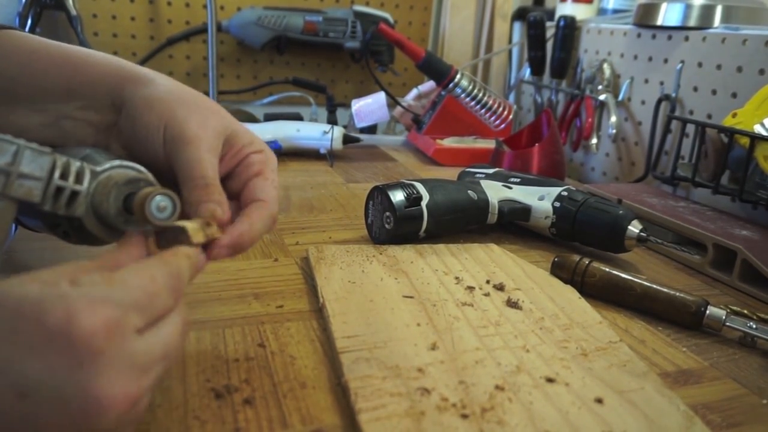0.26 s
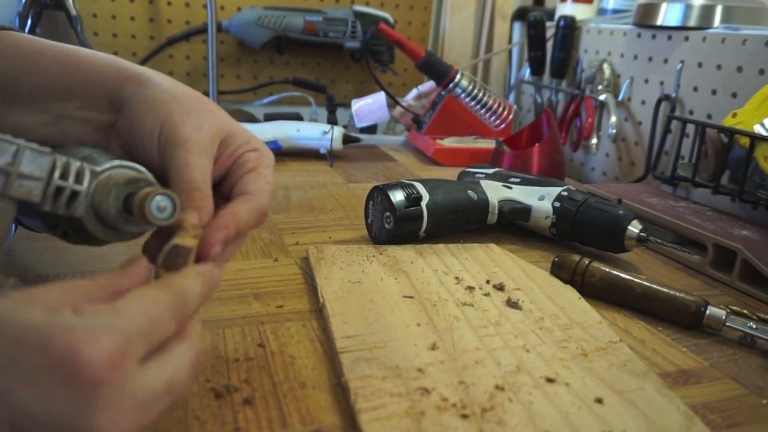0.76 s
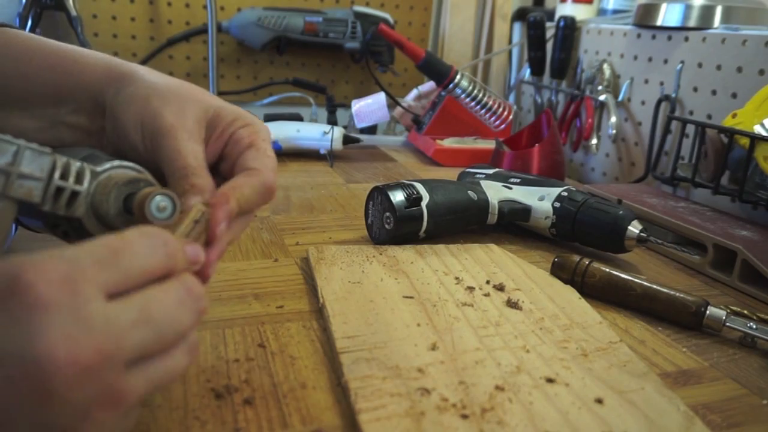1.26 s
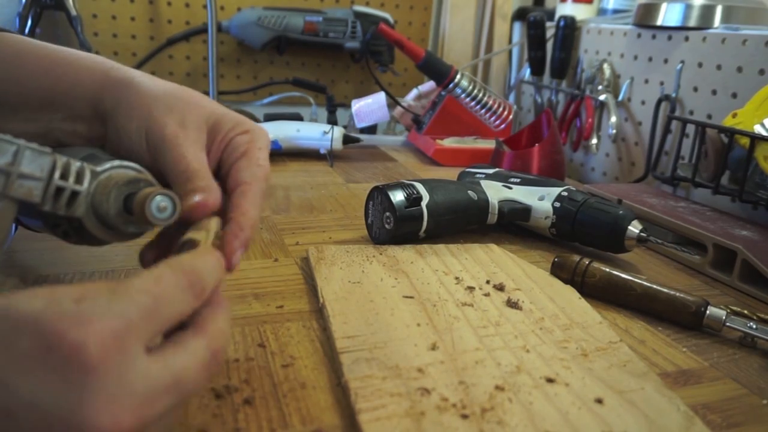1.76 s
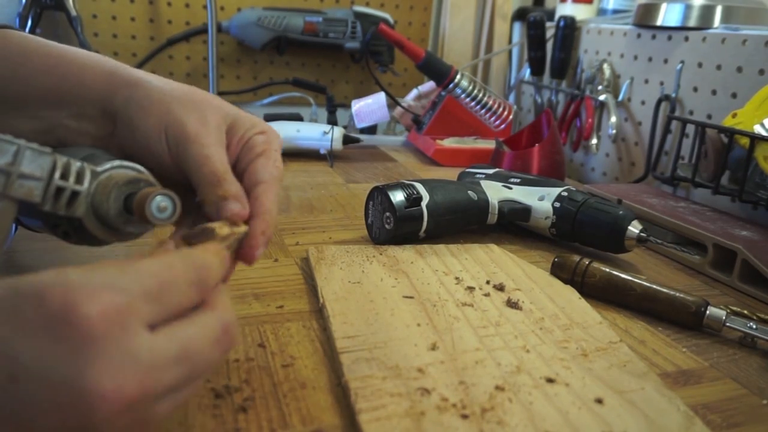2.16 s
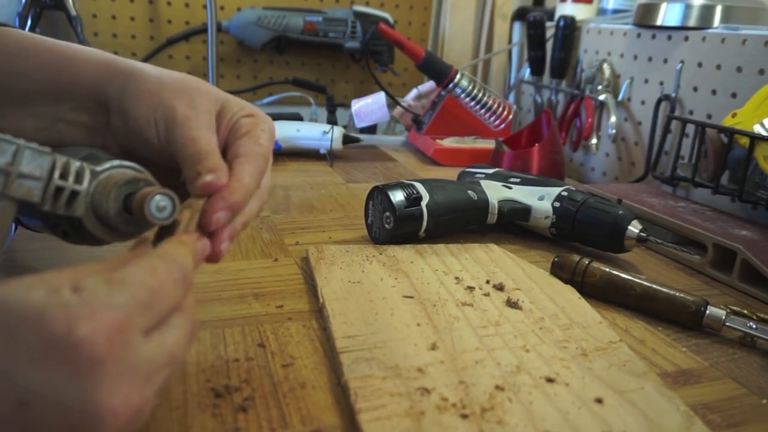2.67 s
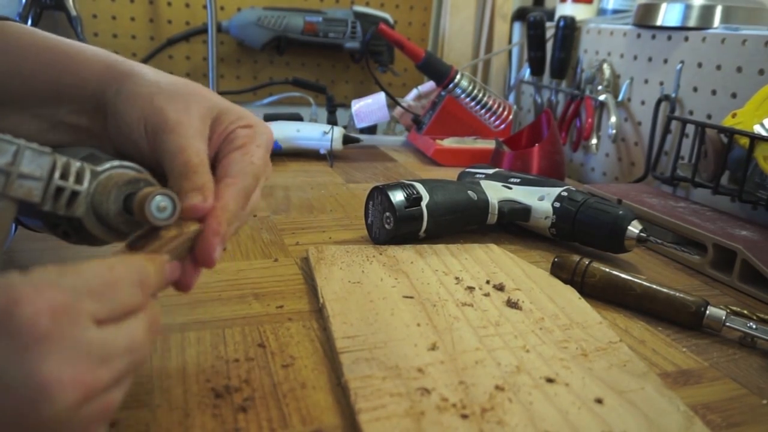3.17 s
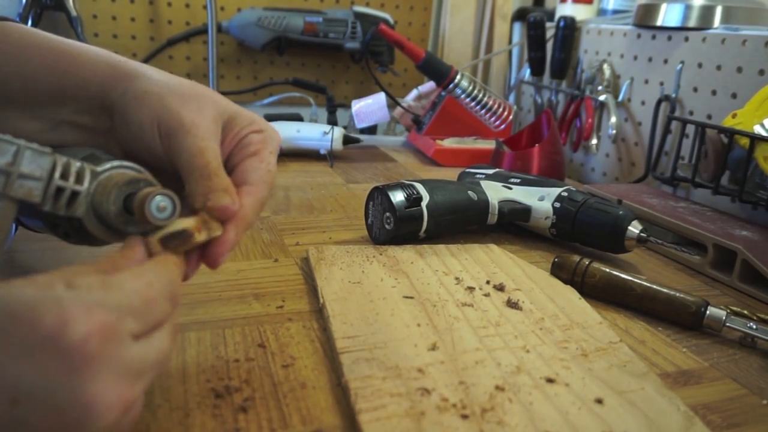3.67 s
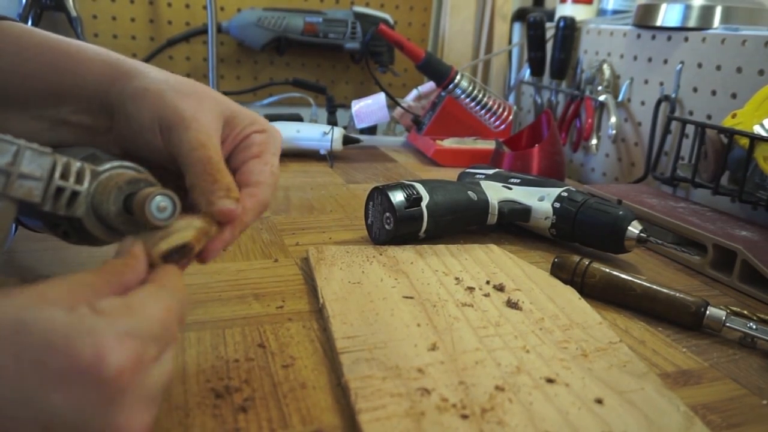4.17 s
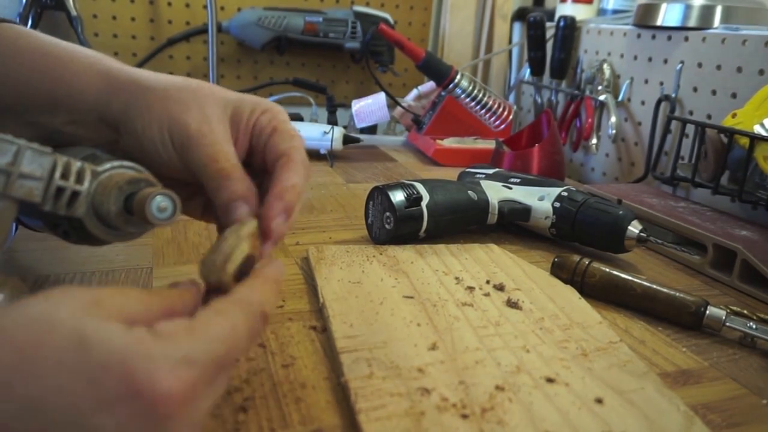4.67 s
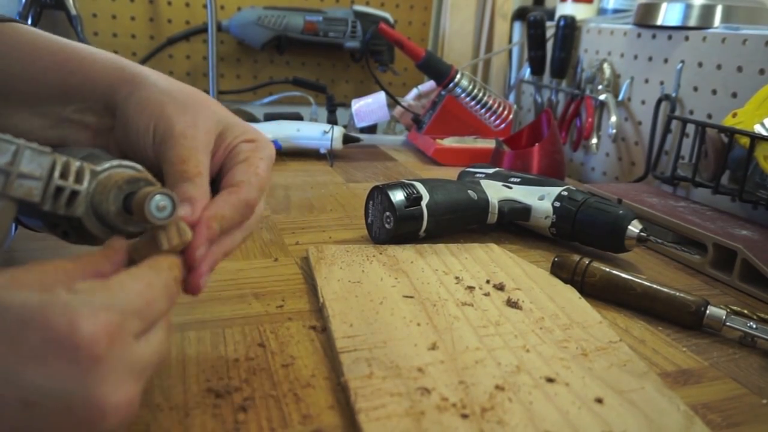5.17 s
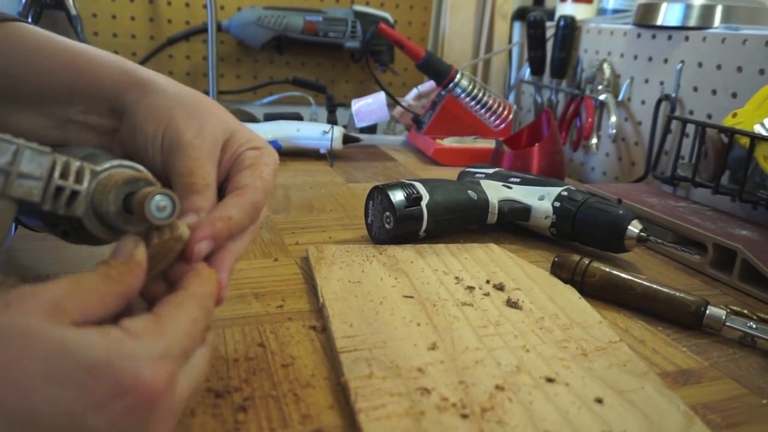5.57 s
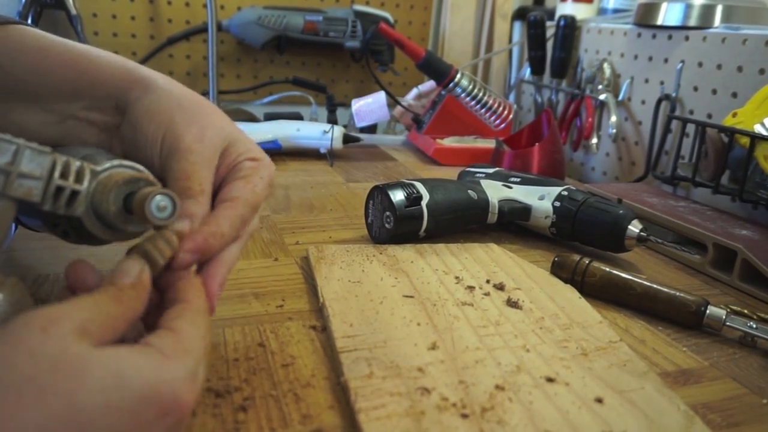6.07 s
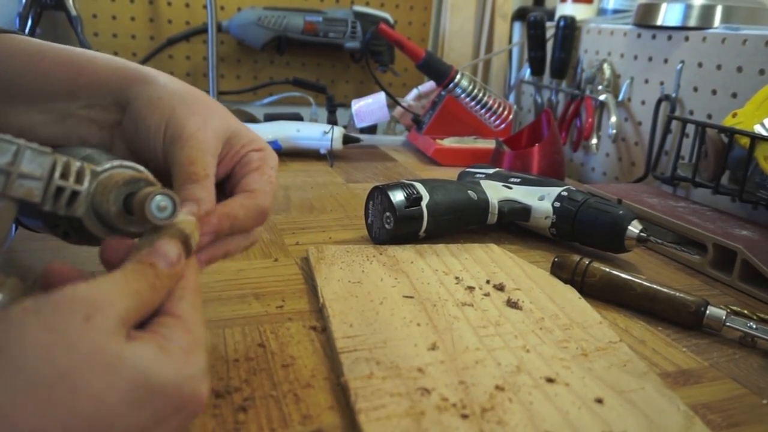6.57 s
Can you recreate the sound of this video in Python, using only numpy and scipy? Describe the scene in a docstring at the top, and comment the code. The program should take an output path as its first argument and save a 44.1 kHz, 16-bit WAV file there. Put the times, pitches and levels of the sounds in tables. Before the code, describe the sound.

A little high-speed motor whines and hisses near the microphone at a workbench. Wood touches the spinning bit again and again, making brief nasal, gritty grinding bursts with dipping pitch. The touches become almost continuous around three to four seconds, then the tool spins freely with one tiny rattle, and separate strokes resume, some very short. A faint low wavering hum lies behind the later part.

```python
"""A small rotary tool runs close to the microphone; wood already presses its bit as the sound opens.
Each short stroke drags the motor's pitch down and makes the bit sing and rasp; between strokes it spins up again.
The chopped motor current whines at a steady pitch, mostly louder under load, and cooling air hisses throughout.
Now and then the bit rattles briefly. A faint wavering hum grows in the background after the first two seconds.
The strokes pause from about 4.2 to 5.1 s, then go on to the end."""
import sys
import numpy as np
from scipy import signal
from scipy.fft import rfft, irfft, next_fast_len
from scipy.io import wavfile

SR = 44100
rng = np.random.default_rng(int(sys.argv[2]) if len(sys.argv) > 2 else 0)


def transcribe(u):
    """Save the signal u as a 16-bit wav file named by the first command-line argument.

    u: samples, shape (n,) or (channels, n), limited to [-1, 1]; the rate is SR.
    q: integer samples, one column per channel.
    """
    v = np.clip(np.atleast_2d(u).T, -1, 1)
    q = np.round(v * 32767).astype(np.int16)
    wavfile.write(sys.argv[1], SR, q)


N = 300321

FREE_HZ, CHOP_HZ = 1358, 960.25  # pitch of the free-running motor, rate of the current chopping


def amp(db):
    """Decibels to gain."""
    return np.exp(np.asarray(db) * (np.log(10) / 20))


def unit(x):
    """Scale to rms 1."""
    return x / np.sqrt(np.mean(x ** 2) + 1e-20)


def along(points, hz):
    """Read (hz, value) points on a log frequency axis."""
    f, v = np.transpose(points)
    return np.interp(np.log(hz + 1), np.log(f), v)


def curve(rows):
    """One value per sample from (s, value) rows."""
    return np.interp(np.arange(N) / SR, *np.transpose(rows))


def wobble(rate):
    """A smooth random curve, rate knots a second."""
    knots = rng.standard_normal(int(N * rate / SR) + 4)
    fine = signal.resample_poly(knots, 8, 1)
    fine_at = np.linspace(0, len(knots), len(fine), endpoint=False)
    return np.interp(np.arange(N) * (rate / SR), fine_at, fine)


def filtered(x, response):
    """x times a response of frequency."""
    size = next_fast_len(N + SR // 4)
    return irfft(rfft(x, size) * response(np.fft.rfftfreq(size, 1 / SR)), size)[..., :N]


def panned(db):
    """Left and right gains for a level difference."""
    return amp(np.array([[.5], [-.5]]) * db)


def noise(spectrum):
    """Stereo noise of rms 1: the share of mid and side sets how alike left and right are."""
    # left-right likeness: hz, correlation
    likeness = [(60, .1), (200, 0.27), (450, 0.91), (1400, 0.94), (2400, 1), (4000, 0.78), (4900, 1),
                (8000, 0.11), (15000, 0.43)]

    def colour(hz):
        angle = np.arccos(np.clip(along(likeness, hz), -1, 1)) / 2
        return amp(along(spectrum, hz)) * [np.cos(angle), np.sin(angle)]

    mid, side = filtered(rng.standard_normal((2, N)), colour)
    return unit(np.array([mid + side, mid - side]))


def strokes():
    """Drag on the motor (Hz) and grinding gain: each stroke catches, presses, eases off and lifts."""
    # strokes of wood against the bit; overlapping ones are one cut with shifting pressure:
    # touch_s, time_to_full_pressure_s, length_s, drag_hz (before the motor's lag),
    # grinding_level_db (relative), first_touch_accent_db
    presses = [(-0.081, 0.048, 0.182, 388, -0.7, 0), (0.094, 0.051, 0.11, 745, 0.0, 2),
               (0.295, 0.085, 0.18, 649, -0.5, 2.5), (0.597, 0.074, 0.15, 593, 0.7, 3.3),
               (0.963, 0.084, 0.15, 500.3, -0.17, 2), (1.219, 0.071, 0.16, 577, -0.2, 2.2),
               (1.46, 0.03, 0.083, 689, -0.3, 4.5), (1.843, 0.063, 0.092, 199.4, -0.2, -0.5),
               (2.025, 0.064, 0.15, 227, 1.8, -0.5), (2.297, 0.079, 0.11, 372, 1, 3),
               (2.541, 0.08, 0.24, 569, 0, 1.5), (2.816, 0.074, 0.13, 571, 2, -2),
               (2.952, 0.066, 0.13, 275.6, -0.0, -6.5), (3.061, 0.046, 0.14, 378, 0.6, 0.5),
               (3.204, 0.013, 0.096, 147, 1.3, -8.5), (3.264, 0.028, 0.092, 497, -0.7, 0.5),
               (3.337, 0.047, 0.122, 237.3, 1.63, -3), (3.406, 0.06, 0.165, 400, 1.2, 1),
               (3.537, 0.078, 0.16, 297, 0.66, -0.5), (3.655, 0.028, 0.104, 481.5, 0.67, 0.2),
               (3.756, 0.023, 0.116, 256.8, -0.2, 5), (3.813, 0.027, 0.095, 384.3, -0.8, 5.5),
               (3.904, 0.029, 0.062, 349.7, 1.5, -1), (3.955, 0.033, 0.082, 418, 1, 1),
               (4.023, 0.053, 0.176, 420, 0.5, -0.5), (4.159, 0.047, 0.08, 519.6, 1.7, -1.5),
               (5.073, 0.073, 0.15, 633, -1.5, 1.5), (5.289, 0.007, 0.018, 30, 4, -0.5),
               (5.329, 0.073, 0.11, 626, 0.5, -1.0), (5.501, 0.086, 0.15, 735, -1.0, -7),
               (5.709, 0.035, 0.1, 641, -0.5, 2.5), (5.856, 0.064, 0.13, 627, -0.4, -2),
               (5.999, 0.032, 0.085, 668, -2, 6), (6.117, 0.03, 0.069, 543, -4, 11.5),
               (6.285, 0.057, 0.11, 576.6, 0.2, 3), (6.465, 0.037, 0.067, 491, -3, 2.5),
               (6.579, 0.041, 0.073, 581.3, -1, 3.8), (6.744, 0.045, 0.096, 560, -3, 6)]
    # the hand presses almost evenly harder, then eases off ever faster (powers of the elapsed share)
    press_power, ease_power = 1.096, 3.08
    # the bit catches the wood at once and lets go a little more slowly
    catch_s, let_go_s = 0.0081, 0.02099
    accent_s = 0.025  # how long the first touch stands out
    t = np.arange(N) / SR
    drag, contact = np.zeros(N), np.zeros(N)
    for touch, rise, length, drag_hz, db, accent_db in presses:
        on = (t > touch) & (t < touch + length)
        age = t[on] - touch
        press = np.clip(age / rise, 0, 1) ** press_power
        ease = np.clip((age - rise) / (length - rise), 0, 1) ** ease_power
        drag[on] += drag_hz * press * (1 - ease)
        grip = np.clip(np.minimum(age / catch_s, (length - age) / let_go_s), 0, 1)
        level = amp(db + accent_db * np.exp(-(age / accent_s) ** 2))
        contact[on] = np.maximum(contact[on], level * grip)
    return drag, contact


def lagged(x, lag_s):
    """x followed with inertia."""
    keep = np.exp(-1 / (lag_s * SR))
    return x[0] + signal.lfilter([1 - keep], [1, -keep], x - x[0])


def speed(drag):
    """The motor's pitch sags under drag and recovers quickly at first, then slowly."""
    quick_lag_s, slow_lag_s, slow_share = .0112, .044, .546
    quick_sag = (1 - slow_share) * lagged(drag, quick_lag_s)
    slow_sag = slow_share * lagged(drag, slow_lag_s)
    return FREE_HZ - quick_sag - slow_sag


def cutting(pitch, turn, load, drift_db, shimmer_db, jitter, load_jitter, blur, spread):
    """The bit strikes once a cycle; its harmonics sweep through fixed resonances and roughen under load."""
    # what tool and wood radiate for each harmonic, body then treble: hz, level_db (relative)
    radiation = [(600, -10), (820, -6), (980, 2.5), (1060, -3), (1170, -22.5), (1400, -23.5), (1650, -12),
                 (2000, -10), (2280, -27.5), (2800, -9.5), (3120, -26), (3550, -11), (4350, -21)] + [(4900, -15), (5350, -10.5), (6000, -6.5), (6500, -4), (7200, -15),
                                (8200, -14.5), (9000, -19), (10100, -10.5), (11000, -17), (13000, -7.5),
                                (14200, -16), (15300, -9.5), (16500, -23)]
    slip = (jitter + load_jitter * load ** 4) * (wobble(170) + .4 * wobble(600))
    out = np.zeros((2, N))
    for k in range(1, 20):
        hz = k * pitch
        high = np.minimum(hz / 6000, 1)
        # the changing contact patch reshuffles the upper harmonics
        reshuffle_db = drift_db * np.tanh(2 * wobble(32)) + shimmer_db * wobble(150)
        level_db = along(radiation, hz) + high * reshuffle_db
        phase = k * (turn + slip) + high * blur * wobble(200) + rng.uniform(0, 2 * np.pi)
        # short waves reach left and right by different paths around the hands
        apart = spread * hz / 10000 * wobble(14)
        wave = np.sqrt(2) * np.sin([phase + apart, phase - apart])
        out += amp(level_db) * (hz < SR / 2) * wave
    return out


def rasp(turn, load, db, load_db, pulsing, grain_db):
    """Fibres tear in uneven puffs, one each cycle, louder under heavy load."""
    # colour of torn fibres: hz, density_db_per_hz (relative)
    fibre_colour = [(30, -11.5), (250, -11.5), (600, -13), (950, -17), (1350, -25), (1750, -9), (2250, -32),
                    (2750, 15), (3150, -9), (3600, 8.5), (4400, -25), (6200, 15), (7500, -5), (10500, -0.5),
                    (13000, 11.5), (16000, -8)]
    puffs = (1 + pulsing * np.cos(turn)) * amp(grain_db * wobble(450))
    return amp(db + load_db * load ** 2) * unit(puffs * noise(fibre_colour))


def bench(x):
    """Short reflections from the bench and the wall behind it, different for left and right."""
    # small things on the bench scatter mainly the treble: hz, gain_db (added to level_db)
    scatter = [(1000, -7), (4000, 2.5)]
    level_db, t60_s = -11.5, 0.11
    t = np.arange(SR // 5) / SR
    tail = rng.standard_normal((2, len(t))) * np.exp(-np.log(1000) * t / t60_s)
    tail /= np.linalg.norm(tail, axis=1, keepdims=True)
    echoes = signal.fftconvolve(x, tail, axes=1)[:, :N]
    return filtered(echoes, lambda hz: amp(level_db + along(scatter, hz)))


def motor_tones(tones, pitch, turn, chop, blur, flutter_db):
    """Motor harmonics and their sidebands with the chopping; they flare when they cross a resonance."""
    # resonances of spindle and housing: centre_hz, width_hz, peak_db
    resonances = [(6308, 296, 22), (10810, 140, 6.5), (15600, 250, 21)]
    out = np.zeros(N)
    for k, m, db in tones:
        k, m = round(k), round(m)
        tone_hz = k * pitch + m * CHOP_HZ
        flare_db = sum(peak_db / (1 + ((tone_hz - hz) / width_hz) ** 2)
                       for hz, width_hz, peak_db in resonances)
        phase = k * turn + m * chop + blur * wobble(110) + rng.uniform(0, 2 * np.pi)
        out += amp(db + flare_db + flutter_db * wobble(70)) * np.sqrt(2) * np.sin(phase)
    return out


def motor(pitch, turn, chop):
    """The turning shaft gives clear tones; the brushes on the commutator give fuzzy ones."""
    # both tables: multiple_of_motor_pitch, plus_multiple_of_chopping_rate, level_db (off resonance)
    shaft_tones = [(1, 0, -49.5), (2, 0, -59), (3, 0, -49.5), (5, 0, -59), (1, 1, -50), (1, 2, -50),
                   (1, 3, -56.5), (2, 1, -79)]
    brush_tones = [(5, 0, -59), (6, 0, -54.5), (7, 0, -53), (8, 0, -51.5), (8, 1, -54.5), (8, -2, -57.5),
                   (12, 0, -76)]
    shaft = motor_tones(shaft_tones, pitch, turn, chop, blur=0.091, flutter_db=1.97)
    return shaft + motor_tones(brush_tones, pitch, turn, chop, blur=0.8, flutter_db=1.5)


def chopper(chop, load, flutter_db):
    """The current's steady whine follows the load; alternate pulses differ, adding a halfway tone."""
    # whine of the chopped current: multiple_of_chopping_rate, free_running_db, gain_at_full_load_db
    whine = [(1, -47, 9), (2, -39, 6.5), (2.5, -62, -17), (3, -41.5, 11.5), (4, -42, 8), (5, -52, 1.5),
             (6, -58.5, 1)]
    out = np.zeros(N)
    for k, db, gain_db in whine:
        phase = round(2 * k) / 2 * chop + rng.uniform(0, 2 * np.pi)
        out += amp(db + gain_db * load + flutter_db * wobble(60)) * np.sqrt(2) * np.sin(phase)
    return out


def rattles(grain_db):
    """The bit chatters for a moment, as short swells of grainy noise."""
    # brief rattles of the bit: centre_s, level_db, half_length_s
    bursts = [(1.628, -31.5, 0.015), (4.075, -36, 0.0073), (4.508, -27, 0.011), (5.57, -28, 0.013),
              (6.258, -28.5, 0.012)]
    # their colour: hz, density_db_per_hz (relative)
    clatter = [(300, -38), (1300, -28), (1750, -4), (2300, -10.5), (3200, 0), (3700, -3), (4400, -13),
               (6000, -15), (16000, -22)]
    t = np.arange(N) / SR
    swell = sum(amp(db) * np.exp(-((t - s) / length) ** 4) for s, db, length in bursts)
    return swell * unit(amp(grain_db * np.tanh(wobble(410))) * noise(clatter))


def air(load, db, load_db, flutter_db):
    """Cooling air and brush hiss leave through the vents as noise."""
    # colour of the air: hz, density_db_per_hz (relative)
    vent_colour = [(30, -28), (300, -27), (700, -17), (1100, -11), (1550, -13), (2250, -10), (2700, 4.5),
                   (3100, -12), (3700, -1.5), (4600, -11.5), (7500, -2), (10000, -10), (12500, -7),
                   (14400, -15.5), (15400, -5), (15900, -10.5)]
    return amp(db + load_db * load + flutter_db * wobble(90)) * noise(vent_colour)


def ports(hz):
    """Level and phase of the close tool at each microphone port."""
    # where the tool sits between the two ports: hz, left_minus_right_db, left_lead_rad
    lean = [(950, -.3, .38), (1350, 1.5, .1), (1900, -.7, .15), (2500, .2, .05), (2880, 2.5, .62),
            (3300, .6, .2), (3850, 1, .9), (4400, -1.5, .3), (4800, .4, .3), (5400, 3.5, .1),
            (6100, -3.5, .6), (6900, -.5, 1.2), (8200, 1, .6), (9100, 5, -.3), (10100, 0, .5),
            (13500, 6, 1), (15500, 6, 1.5)]
    f, db, lead = np.transpose(lean)
    turned = np.exp(np.array([[.5j], [-.5j]]) * along(np.c_[f, lead], hz))
    return panned(along(np.c_[f, db], hz)) * turned


def hum(waver, waver_db):
    """A faint low hum in the background wavers, with thin tones that come and go."""
    # level of the hum: time_s, level_db
    hum_level = [(0, -83), (2.2, -81), (2.8, -69.5), (4.3, -64.5), (5.2, -67), (5.9, -61), (6.8, -69.5)]
    # its colour: hz, density_db_per_hz (relative)
    hum_colour = [(200, -32.5), (350, -10.5), (400, -5), (440, -8), (480, -1.5), (550, -28), (900, -49)]
    # thin tones in the hum: pitch_hz, level_db, loudest_at_s, half_length_s
    thin_tones = [(397, -70.5, 3.5, 1.28), (482, -75.5, 3.5, 2.8), (705, -68.5, 1.3, 1.09)]
    t = np.arange(N) / SR
    out = amp(curve(hum_level) + waver_db * wobble(5.4)) * noise(hum_colour)
    for hz, db, s, length in thin_tones:
        phase = 2 * np.pi * np.cumsum(hz * (1 + waver * wobble(3))) / SR
        swell = amp(db + waver_db * wobble(3.09)) * np.exp(-((t - s) / length) ** 4)
        out = out + swell * np.sqrt(2) * np.sin(phase)
    return out


def scene():
    """The strokes set the motor's speed and the contact with the wood, which drive the tool's layers."""
    full_load_sag_hz = 494
    drag, contact = strokes()
    pitch = speed(drag)
    load = np.clip((FREE_HZ - pitch) / full_load_sag_hz, 0, 1.1)  # 0 running free, 1 pressed hard
    # uneven grain tugs at the speed; a trace of unsteadiness is always there
    tug = .007 * load * contact
    pitch = pitch * (1 + (.0004 + tug) * wobble(100) + tug * wobble(28))
    turn = 2 * np.pi * np.cumsum(pitch) / SR
    chop = 2 * np.pi * CHOP_HZ * np.arange(N) / SR

    cut = cutting(pitch, turn, load, drift_db=4.6, shimmer_db=2.3,
                  jitter=.018, load_jitter=.035, blur=.6, spread=.5)
    fibres = rasp(turn, load, db=-40, load_db=7.0, pulsing=0.61, grain_db=4.5)
    # the wood bounces lightly on the bit
    chatter = amp(1.8 * np.tanh(wobble(160)))
    grind = contact * chatter * (amp(-28.5) * cut + fibres)

    tool = grind + bench(grind) + motor(pitch, turn, chop)
    tool = tool + chopper(chop, load, flutter_db=0.71) + rattles(grain_db=5)
    tool = tool + air(load, db=-37.0, load_db=3, flutter_db=0.87)
    return filtered(tool, ports) + hum(waver=.011, waver_db=1)


def record(dry):
    """The microphone's signal keeps nothing from its band limit up."""
    top_hz = 15900
    return filtered(dry, lambda hz: hz < top_hz)


dry = scene()
out = record(dry)
transcribe(out)
```